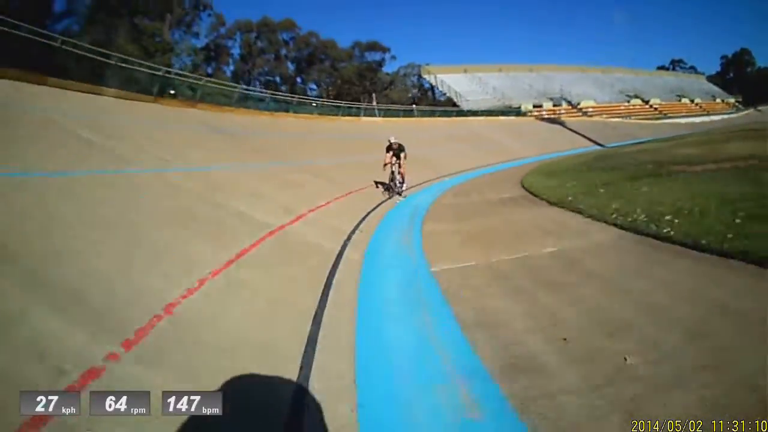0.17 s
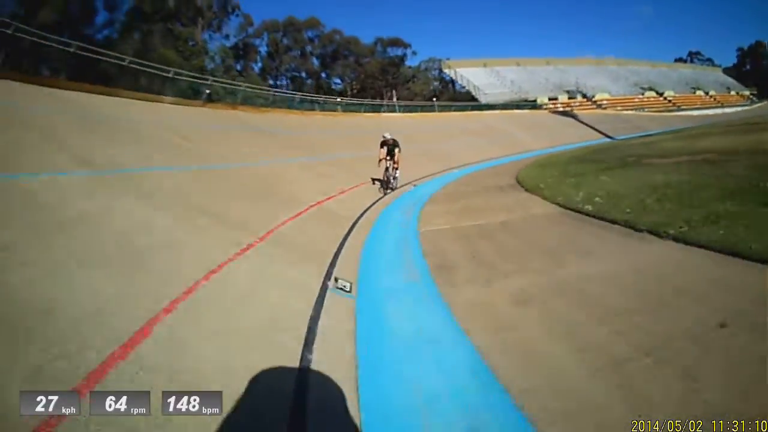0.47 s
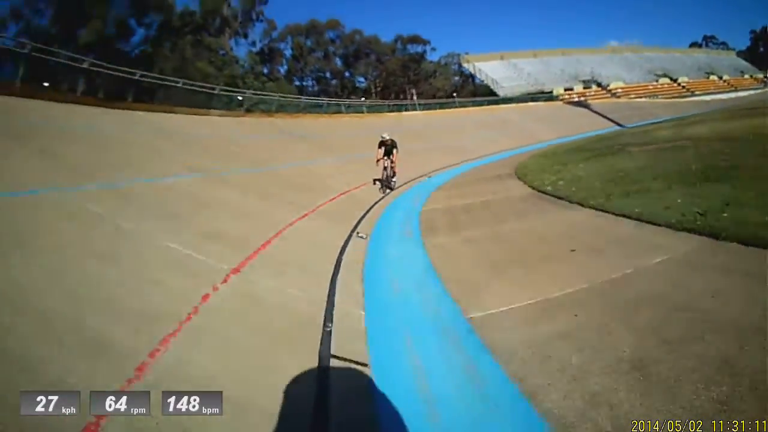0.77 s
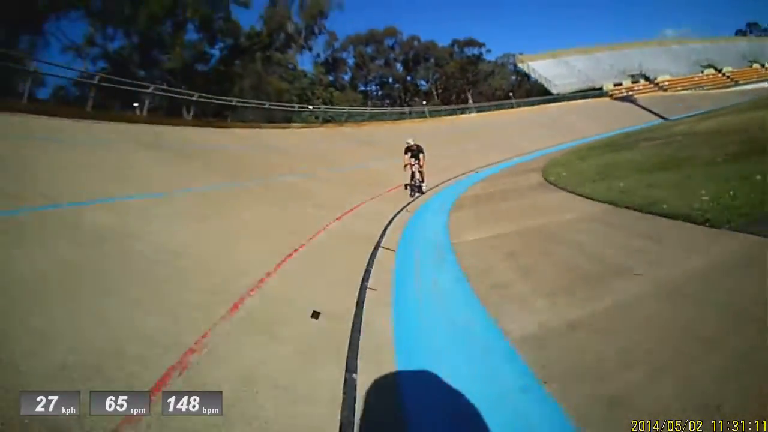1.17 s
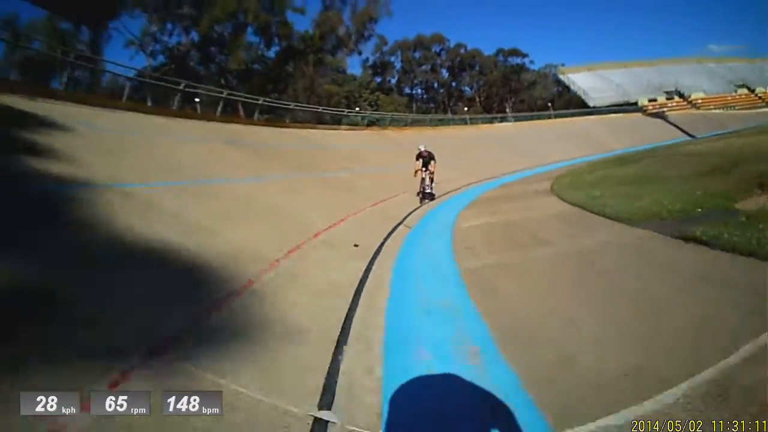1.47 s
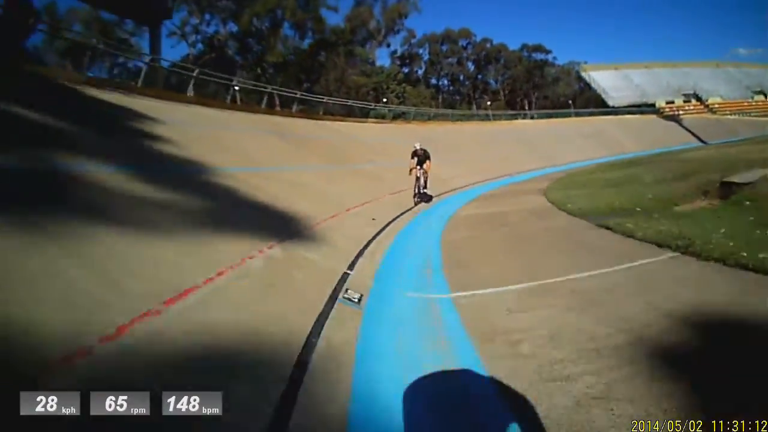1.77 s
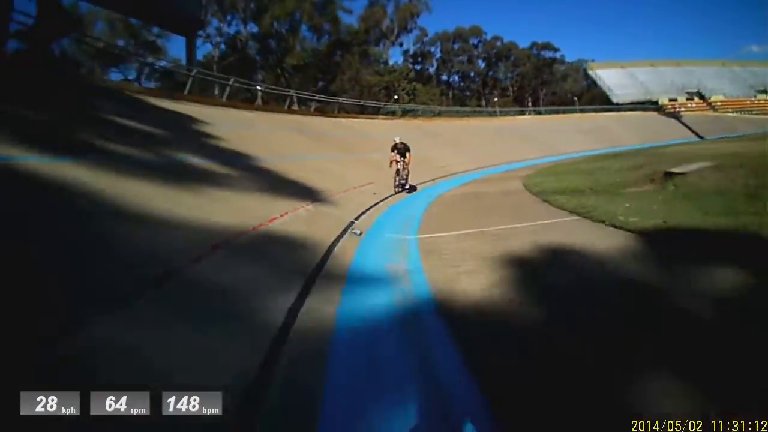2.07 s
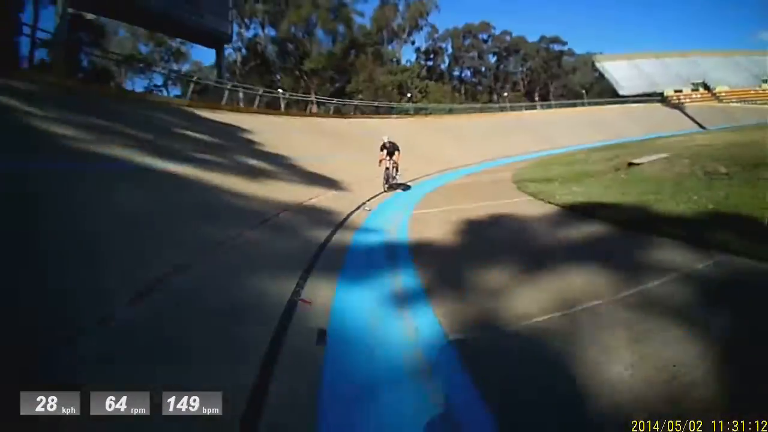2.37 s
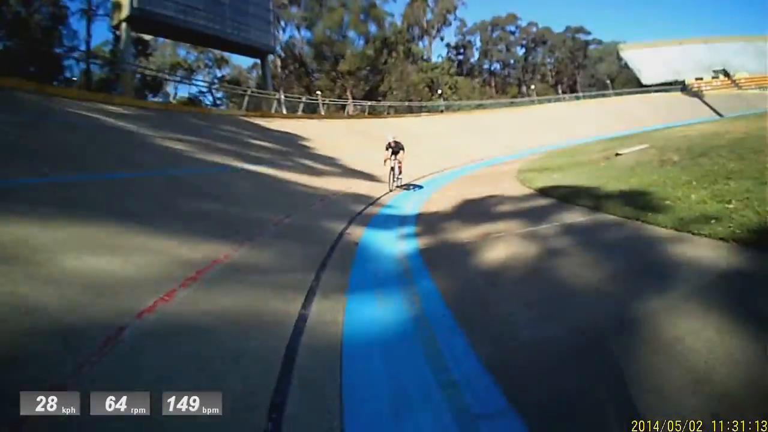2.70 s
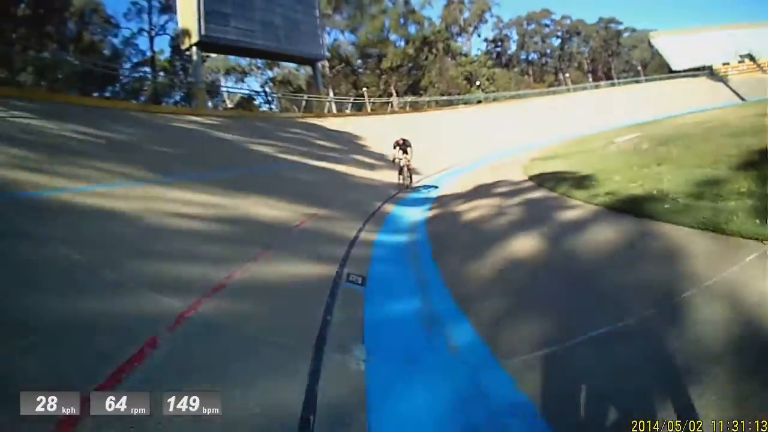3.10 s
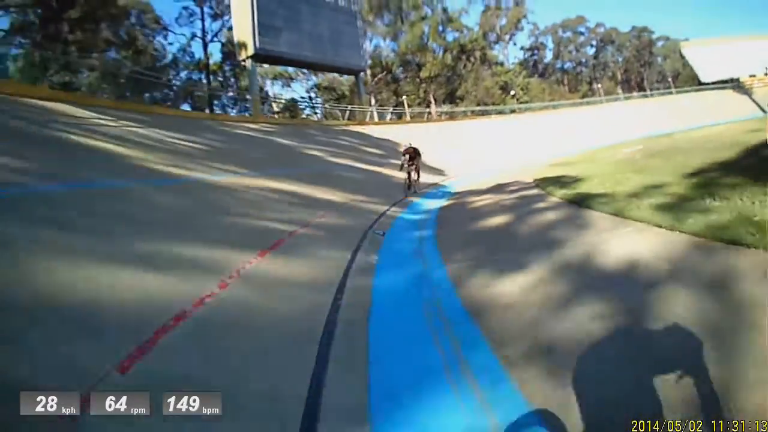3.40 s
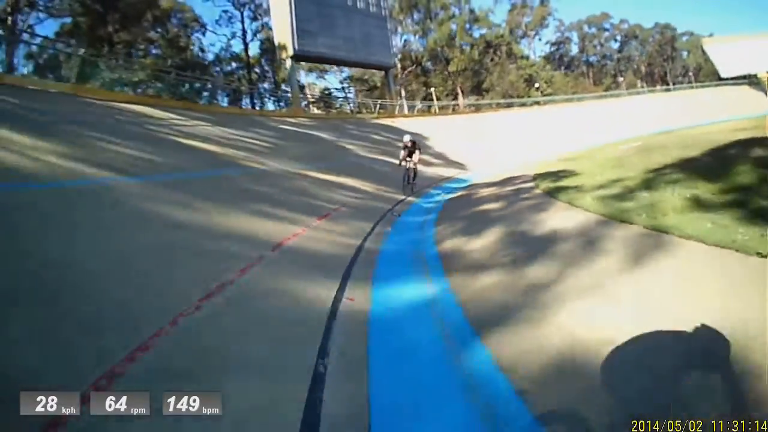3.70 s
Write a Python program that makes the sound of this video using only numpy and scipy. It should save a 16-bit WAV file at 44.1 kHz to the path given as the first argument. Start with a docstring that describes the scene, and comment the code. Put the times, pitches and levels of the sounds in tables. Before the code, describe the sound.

Low gusty wind on the microphone of a rolling bicycle, its chain ticking softly.

```python
"""A concrete track, heard from a camera riding on a bicycle.
Wind rumbles on the microphone port and breaks into short buffets as eddies hit it. The tyres roll
with a steady rush that rings faintly in the frame, the chain ticks tooth by tooth, and vibration
shakes out a fine sizzle that comes and goes, with sharper clicks from a loose part."""
import sys
import numpy as np
from scipy import signal
from scipy.fft import rfft, irfft, next_fast_len
from scipy.io import wavfile
from scipy.ndimage import uniform_filter1d

SR = 44100
rng = np.random.default_rng(int(sys.argv[2]) if len(sys.argv) > 2 else 0)


def wav_out(sig):
    """Save sig, one row per channel (or a flat mono array), as 16-bit PCM at SR to the path in sys.argv[1]."""
    wavfile.write(sys.argv[1], SR, np.round(np.clip(np.atleast_2d(sig).T, -1, 1) * 32767).astype(np.int16))


N = 169785
TIME = np.arange(N) / SR


def from_db(db):
    """Decibels to gain."""
    return 10 ** (np.asarray(db) / 20)


def rms_one(x):
    """Scale to rms 1."""
    return x / np.sqrt(np.mean(x ** 2) + 1e-20)


def envelope(rows):
    """Gain per sample from rows of time in seconds, level in dB."""
    return from_db(np.interp(TIME, *np.transpose(rows)))


def evened(x, span_s):
    """Flatten swells longer than the span; rms 1."""
    width = max(int(span_s * SR), 2)
    power = uniform_filter1d(uniform_filter1d(x * x, width), width)
    return rms_one(x / np.sqrt(np.abs(power) + 1e-6))


def drift(rate_hz):
    """Slow random wander, rms 1."""
    hop, settle = 40, 2000
    pole = np.exp(-2 * np.pi * rate_hz * hop / SR)
    white = rng.standard_normal(N // hop + settle + 2)
    slow = signal.lfilter([1], [1, -2 * pole, pole * pole], white)[settle:]
    return np.interp(np.arange(N) / hop, np.arange(len(slow)), rms_one(slow))


def flutter(rate_hz, depth_db):
    """Randomly wavering gain, rms 1."""
    return rms_one(from_db(depth_db * 2 * np.tanh(drift(rate_hz) / 2)))


def coloured(x, colour):
    """Filter to rms 1. Each colour row: frequency in Hz, relative level in dB."""
    hz, db = np.transpose(colour)
    size = next_fast_len(N)
    bins_hz = np.maximum(np.fft.rfftfreq(size, 1 / SR), 1)
    gain = from_db(np.interp(np.log(bins_hz), np.log(hz), db))
    skirts = np.minimum(bins_hz / hz[0], 1) * np.minimum(hz[-1] / bins_hz, 1) ** 5
    return rms_one(irfft(rfft(x, size) * gain * skirts, size)[:N])


def noise(colour):
    """Coloured Gaussian noise, rms 1."""
    return coloured(rng.standard_normal(N), colour)


def tyres():
    """Rubber rushes on concrete; frame and camera mount resonate under it with a wavering hum."""
    # Each row: frequency in Hz, relative level in dB.
    rush_colour = [(200, 7), (400, 5), (700, -4), (1150, 4), (1550, -2.5), (1900, -4.5), (2500, -1),
                   (2850, -5.5), (3300, -0.5), (4000, -3), (4700, -30.5), (6000, -50.5)]
    # Each row: resonance in Hz, width in Hz, level in dB.
    frame_modes = [(382.4, 65, -56), (526.4, 66, -65), (585, 30, -65.5), (881, 48, -63.5), (1323, 25, -71),
                   (1703, 39, -72.5), (2177, 80, -70), (3185, 330, -72)]
    rush = from_db(-56.5) * noise(rush_colour)
    waver = 1 + 0.012 * drift(rate_hz=3)
    rad_per_hz = 2 * np.pi * np.cumsum(waver) / SR
    hum = 0
    for hz, width_hz, db in frame_modes:
        lowpass = signal.butter(2, width_hz / 2, fs=SR, output="sos")
        i, q = signal.sosfilt(lowpass, rng.standard_normal((2, N)))
        mode = i * np.cos(hz * rad_per_hz) + q * np.sin(hz * rad_per_hz)
        hum = hum + from_db(db) * evened(mode, span_s=0.26)
    return (rush + hum) * flutter(rate_hz=30, depth_db=3.16)


def sizzle():
    """Vibration shakes a fine rattle out of the bicycle: tiny clicks in a flickering hiss."""
    # Each row: time in seconds, relative level in dB.
    levels = [(0, -54), (.08, -74), (.2, -64), (.28, -71), (.42, -62), (.47, -92), (.53, -93), (.56, -61),
              (.72, -67), (.77, -82), (.83, -59), (.98, -64.5), (1.14, -70), (1.2, -58.5), (1.31, -61),
              (1.4, -87), (1.47, -66), (1.52, -89), (1.57, -59), (1.64, -76), (1.67, -57.5), (1.78, -65.5),
              (1.94, -64.5), (2.0, -92), (2.14, -103), (2.22, -64.5), (2.3, -120.5), (2.45, -82),
              (2.56, -58), (2.74, -62), (2.8, -80.5), (2.86, -55), (2.91, -93), (3.06, -101.5),
              (3.26, -100), (3.41, -53.5), (3.45, -87), (3.57, -83), (3.63, -55), (3.72, -101), (3.85, -96)]
    # Each row: frequency in Hz, relative level in dB.
    colour = [(1500, -3), (3300, 17), (4800, 12.5), (6800, -1), (8200, -26.5)]
    grains_per_s, spread_db, grain_share = 960, 4.5, 0.95
    sizes = from_db(spread_db * np.minimum(rng.exponential(1, N), 2))
    signs = rng.choice([-1, 1], N)
    grains = rms_one(sizes * signs * (rng.random(N) < grains_per_s / SR))
    source = np.sqrt(grain_share) * grains + np.sqrt(1 - grain_share) * rng.standard_normal(N)
    return from_db(2) * envelope(levels) * coloured(source, colour) * flutter(rate_hz=30, depth_db=4)


def rattle():
    """A loose part clicks now and then: mostly dull, sometimes with a bright splash on top."""
    # Each row: peak time in seconds, relative level in dB, brightness in dB.
    clicks = [(0.039, -47.5, -10), (.19, -54.5, -12), (.425, -51, -19), (0.557, -48, -13), (0.605, -49, 3),
              (0.625, -51, -12), (.715, -46, 3), (0.825, -45, -18), (0.854, -43.5, -4), (0.881, -48.5, 5),
              (0.924, -53, -12), (1.067, -51.5, 12.5), (1.19, -45, 5), (1.269, -47, -16), (1.299, -43, 1),
              (1.573, -49, -31), (1.666, -44.5, -17), (1.746, -52.5, 14), (1.924, -55.5, 9),
              (2.484, -48.5, -17), (2.561, -42, 6), (2.678, -48, -25), (2.863, -45.5, -27),
              (3.418, -42, -15), (3.625, -47, -15), (3.678, -46.5, 10)]
    # Each row of both: frequency in Hz, relative level in dB.
    body_colour = [(1500, -3.5), (3300, 14), (5000, 9.5), (7000, 10), (8300, -13.5)]
    splash_colour = [(7000, -10), (8500, -7.5), (9700, -1), (11300, -11), (12600, -7), (14000, -16)]
    rise_s, decay_s = 0.0066, 0.0054
    body, splash = 0, 0
    for peak_s, db, bright_db in clicks:
        tau_s = np.where(TIME < peak_s, rise_s, decay_s)
        burst = from_db(db - 7.5) * np.exp(-np.abs(TIME - peak_s) / tau_s)
        body = body + burst
        splash = splash + from_db(bright_db - 20.5) * burst
    return body * noise(body_colour) + splash * noise(splash_colour)


def chain():
    """Each link seats on the chainring with a tiny ping at its own pitch; a few knock harder."""
    # Each row: start in seconds, relative peak level in dB.
    knocks = [(0.132, -34), (0.4873, -37.5), (0.7658, -35), (0.7874, -46), (0.8038, -34), (1.063, -31.5),
              (1.2203, -41), (1.4579, -33.5), (1.7426, -30.5), (1.8347, -32), (1.892, -38), (1.9502, -32),
              (2.084, -42.5), (2.1405, -42), (2.5396, -34.5), (2.6182, -34.5), (2.8662, -37), (2.884, -36),
              (2.979, -38), (3.019, -35), (3.095, -38), (3.2677, -39.5), (3.4594, -31.5), (3.498, -36),
              (3.538, -36), (3.668, -33), (3.7827, -35.5)]
    teeth_per_s, jitter_s, tooth_db, spread_db = 51.5, 0.0015, -51, 3
    ping_hz, scatter_hz, t60_s, contact_s = 3273, 79.4, 0.017, 0.0007
    teeth_s = np.arange(0, N / SR, 1 / teeth_per_s)
    lateness, strength = rng.standard_normal((400, 2))[:len(teeth_s)].T
    knock_s, knock_db = np.transpose(knocks)
    starts_s = np.r_[knock_s, np.maximum(teeth_s + jitter_s * lateness, 0)]
    peaks_db = np.r_[knock_db - 8.5, tooth_db + spread_db * np.minimum(strength, 1.5)]
    pitches_hz = ping_hz + scatter_hz * rng.standard_normal(500)
    age_s = np.arange(SR // 20) / SR
    attack = 1 - np.exp(-(age_s / contact_s) ** 2)
    ring = attack * np.exp(-np.log(1000) * age_s / t60_s)
    ticks = np.zeros(N + SR)
    for at, db, hz in zip((starts_s * SR).astype(int), peaks_db, pitches_hz):
        ticks[at:at + len(ring)] += from_db(db) * ring / ring.max() * np.sin(2 * np.pi * hz * age_s)
    return ticks[:N]


def vortices():
    """An uneven run of small vortices, each a sharp pressure dip, in a rush of air."""
    dips_per_s, dip_share = 170, 0.38
    gaps, sizes = rng.uniform(0.4, 1.6, (2000, 2)).T
    at = (np.cumsum(gaps) * SR / dips_per_s).astype(int)
    dips = np.zeros(N)
    dips[at[at < N]] = -sizes[at < N]
    return np.sqrt(dip_share) * rms_one(dips) + np.sqrt(1 - dip_share) * rng.standard_normal(N)


def buffets():
    """Eddies hit the port, each a brief, dull, rough flap; the hardest crackle."""
    # Each row: peak time in seconds, decay time in seconds, relative level in dB.
    eddies = [(0.137, 0.013, -35), (0.407, 0.0031, -30), (0.42, 0.0055, -26.5), (0.518, 0.0044, -25),
              (0.943, 0.011, -39), (1.4, 0.011, -22.5), (1.95, 0.01, -32), (2.133, 0.0096, -32.5),
              (2.262, 0.0092, -27.5), (2.282, 0.0076, -23), (2.311, 0.0094, -26), (2.331, 0.0089, -20.5),
              (2.352, 0.0072, -28.5), (2.396, 0.0038, -28), (2.444, 0.0043, -30), (2.684, 0.007, -27.5),
              (2.739, 0.0051, -32.5), (2.794, 0.014, -32), (2.817, 0.013, -27), (2.889, 0.0098, -22.5),
              (2.933, 0.014, -27), (2.961, 0.0055, -25.5), (3.058, 0.011, -24.5), (3.108, 0.014, -34.5),
              (3.215, 0.005, -25.5), (3.238, 0.0089, -26.5), (3.26, 0.011, -32.5), (3.303, 0.0018, -27.5),
              (3.426, 0.0048, -24), (3.44, .011, -23.5), (3.463, 0.0092, -26.5), (3.735, 0.0067, -29),
              (3.776, 0.0048, -28)]
    # Each row of both: frequency in Hz, relative level in dB.
    flap_colour = [(40, -6.5), (85, 10.5), (160, -1.5), (290, -4), (450, -12), (700, -21), (1100, -35),
                   (1700, -49.5), (3000, -66)]
    crackle_colour = [(400, -19), (900, 4), (1250, 0), (1600, -12)]
    power = 0
    for peak_s, decay_s, db in eddies:
        width_s = decay_s * np.where(TIME < peak_s, 0.51, 1)  # faster rise than fall
        power = power + from_db(db) ** 2 * np.exp(-((TIME - peak_s) / width_s) ** 2)
    flap = from_db(1.5) * np.sqrt(power) * evened(coloured(vortices(), flap_colour), span_s=0.015)
    crackle = from_db(-46.5) * power / power.max() * coloured(vortices(), crackle_colour)
    return flap + crackle


def wind():
    """Deep pressure swings on the microphone port, with lumpy finer turbulence above them."""
    # Each row of both: time in seconds, relative level in dB.
    rumble_levels = [(0.0, -33.5), (0.03, -30), (0.28, -25), (0.36, -37.5), (0.42, -23), (0.66, -33.5),
                     (0.73, -28.5), (1.35, -26.5), (1.41, -25.5), (1.91, -27), (2.11, -23), (2.27, -24),
                     (2.32, -17), (2.36, -28.5), (2.41, -17.5), (2.57, -29.5), (2.63, -24), (2.98, -20),
                     (3.1, -27.5), (3.23, -17), (3.37, -23.5), (3.52, -18.5), (3.63, -29), (3.85, -22)]
    turbulence_levels = [(0, -38), (.15, -42.5), (.33, -39), (.48, -45), (.6, -46.5), (.88, -41.5),
                         (1.03, -43), (1.3, -42), (1.5, -31), (1.7, -46), (1.87, -39.5), (2.05, -38.5),
                         (2.22, -38.5), (2.42, -32), (2.58, -35.5), (2.85, -34.5), (3.12, -29), (3.3, -37),
                         (3.55, -34), (3.85, -32.5)]
    # Each row of both: frequency in Hz, relative level in dB.
    rumble_colour = [(12, -4.5), (27, 4), (50, -2), (80, -12.5), (120, -22), (170, -21.5), (300, -53.5),
                     (600, -62)]
    turbulence_colour = [(50, 7.5), (110, 6.5), (160, -2.5), (260, -4.5), (380, -12), (550, -16),
                         (800, -25), (1400, -35.5), (3000, -68.5)]
    rumble = envelope(rumble_levels) * evened(noise(rumble_colour), span_s=0.17)
    turbulence = envelope(turbulence_levels) * evened(noise(turbulence_colour), span_s=0.29)
    return from_db(-1) * rumble + from_db(-1.5) * turbulence * flutter(rate_hz=16, depth_db=2.5)


def scene():
    """Wind and bicycle at one microphone."""
    return (wind() + buffets() + tyres() + chain() + sizzle() + rattle())[None]


def record(dry):
    """Steep low-pass on the top treble."""
    stop_db, stop_hz = 70, 15000
    return signal.sosfilt(signal.cheby2(12, stop_db, stop_hz, fs=SR, output="sos"), dry)


dry = scene()
out = record(dry)
wav_out(out)
```